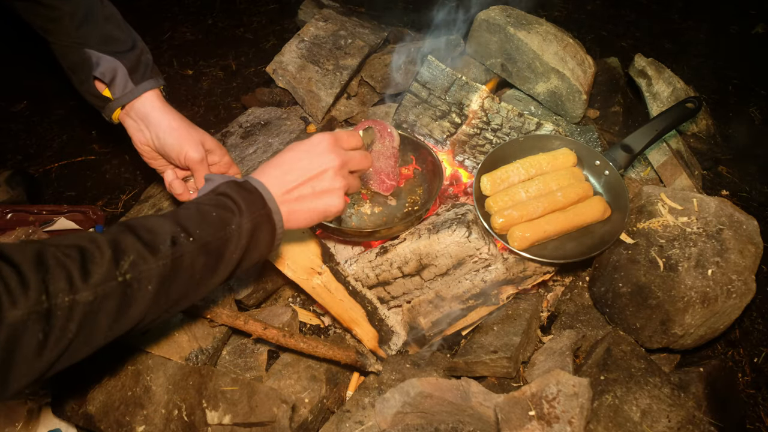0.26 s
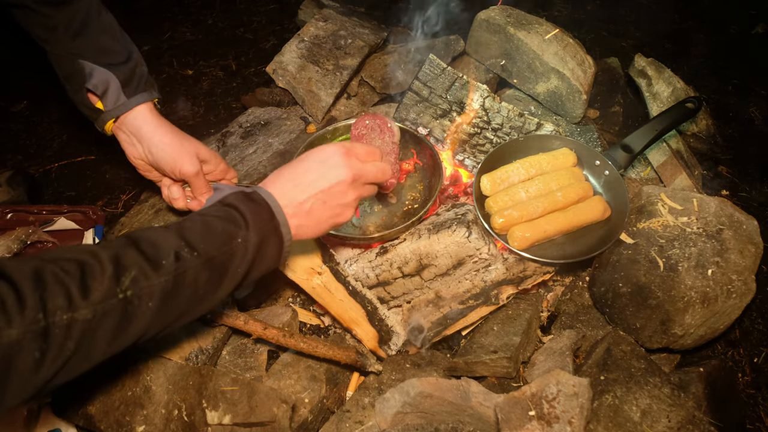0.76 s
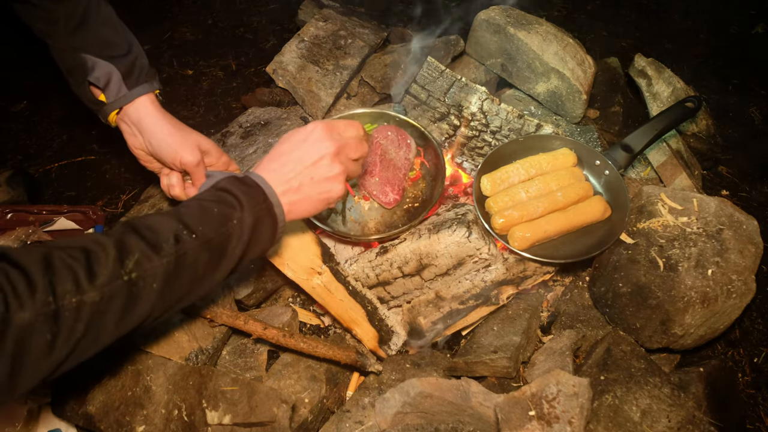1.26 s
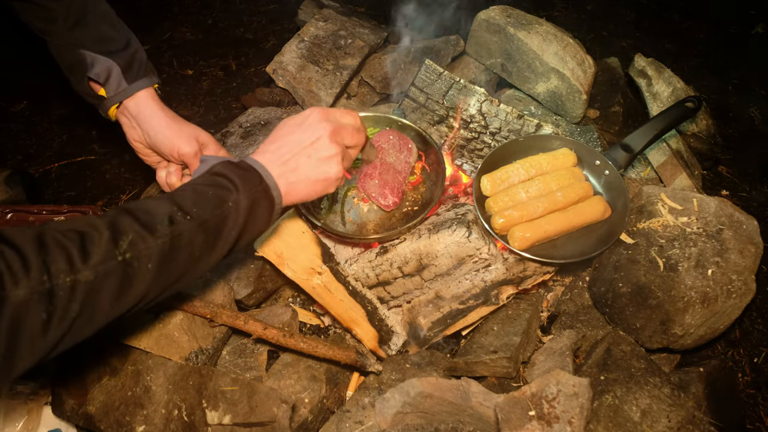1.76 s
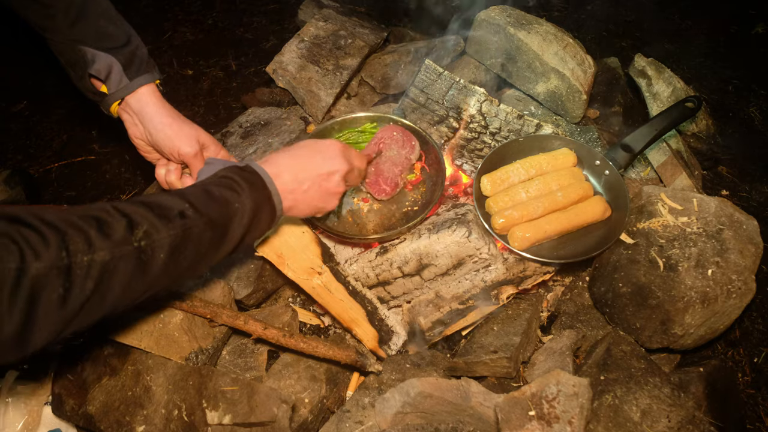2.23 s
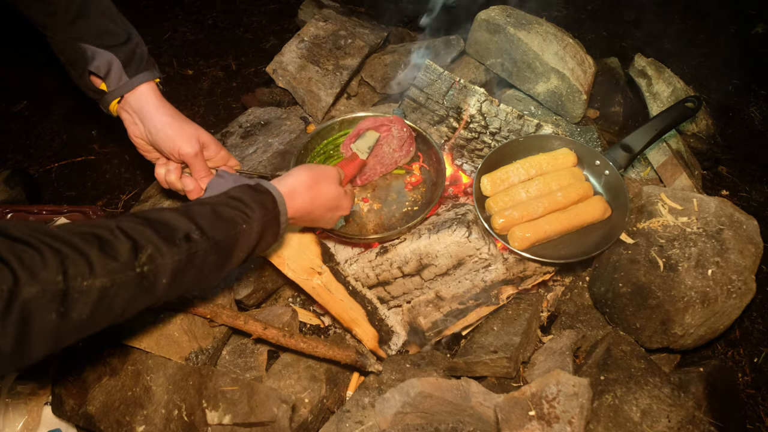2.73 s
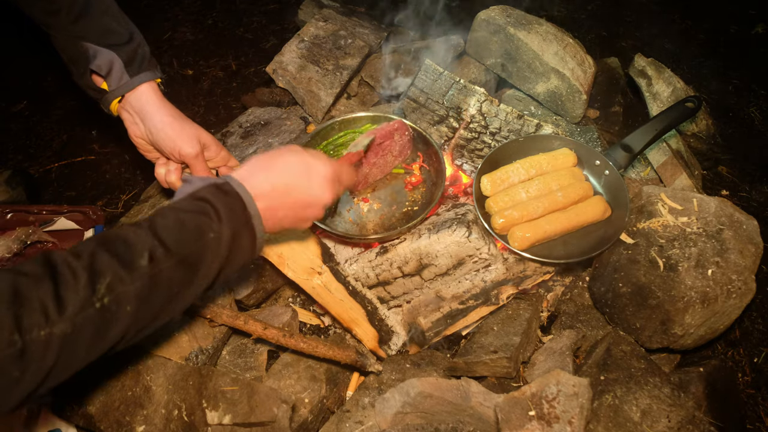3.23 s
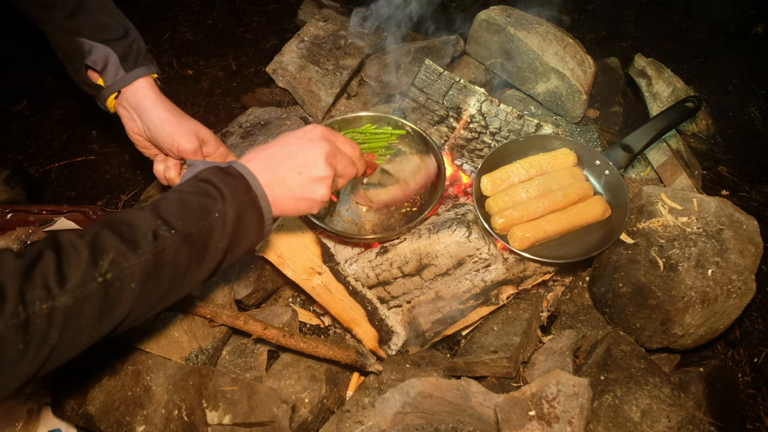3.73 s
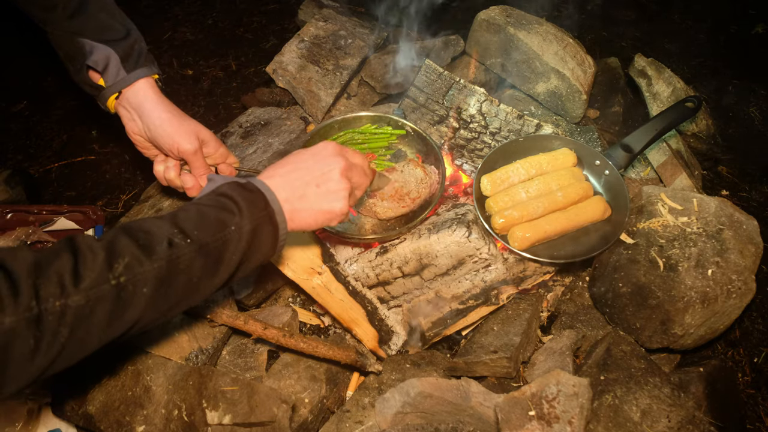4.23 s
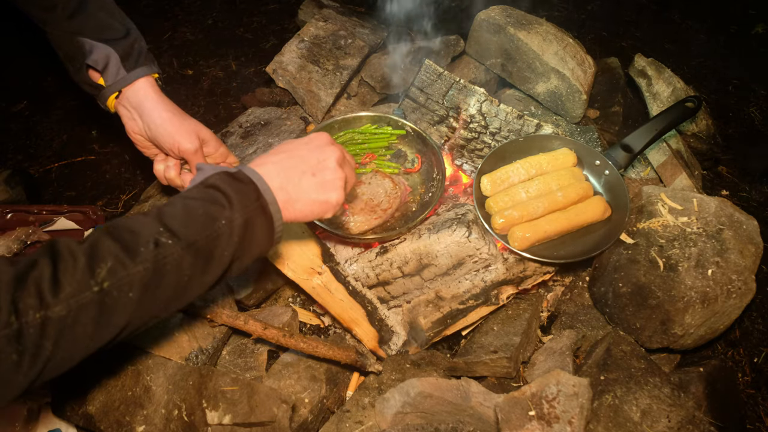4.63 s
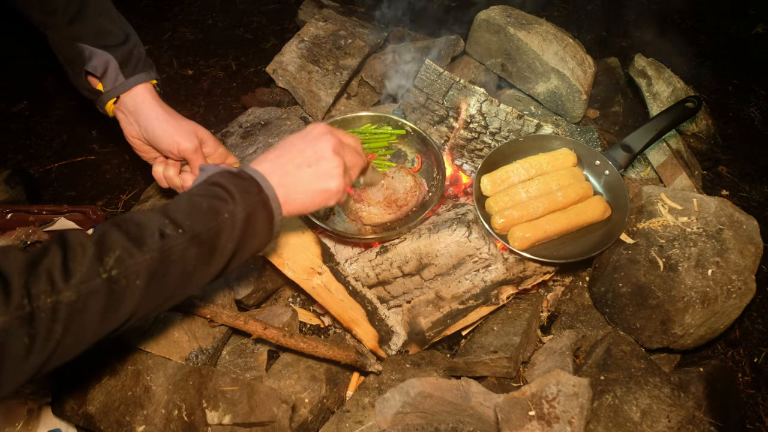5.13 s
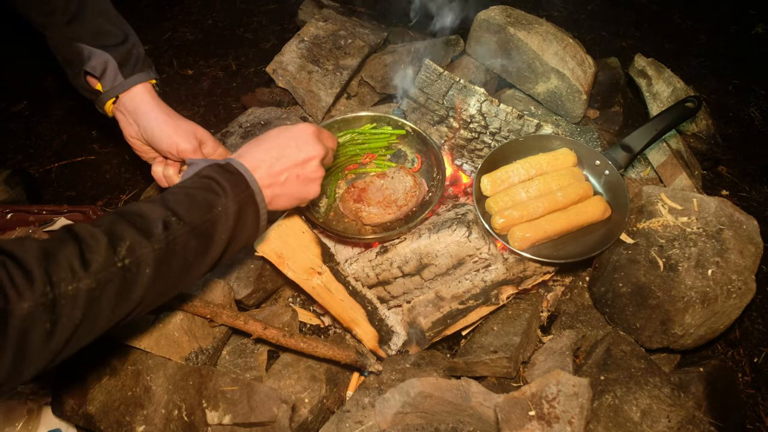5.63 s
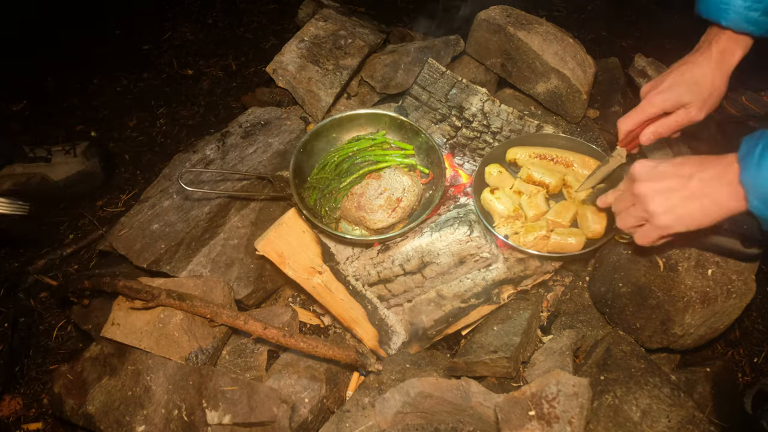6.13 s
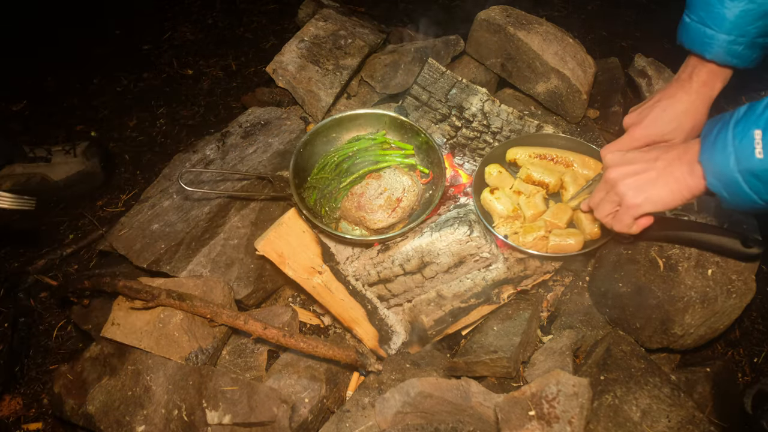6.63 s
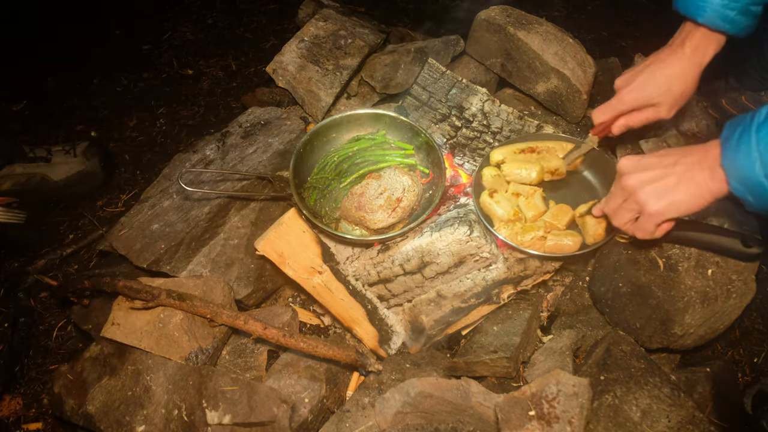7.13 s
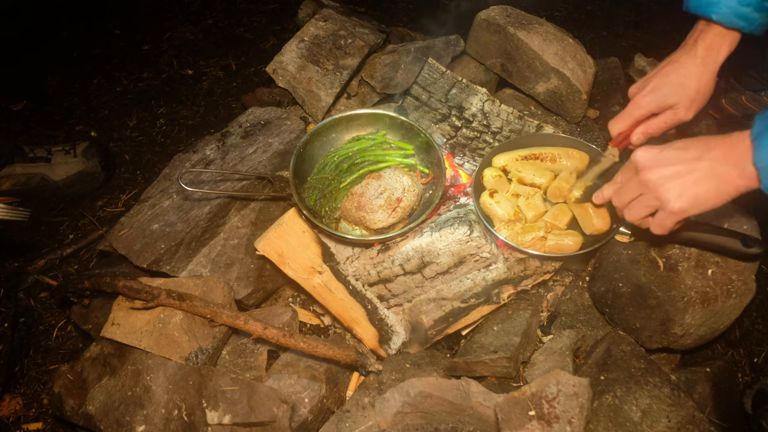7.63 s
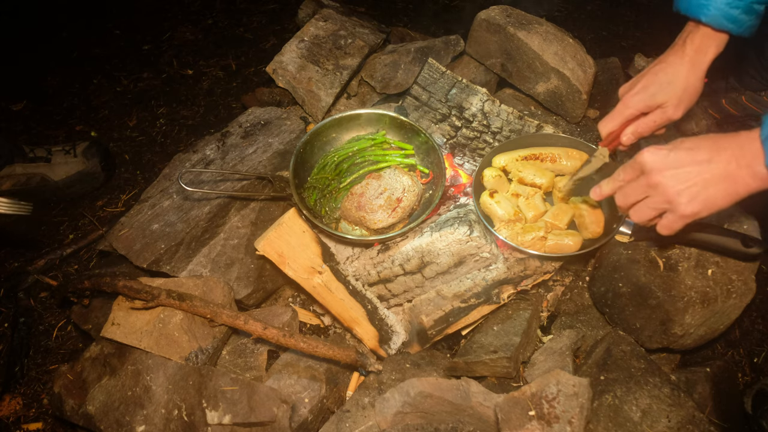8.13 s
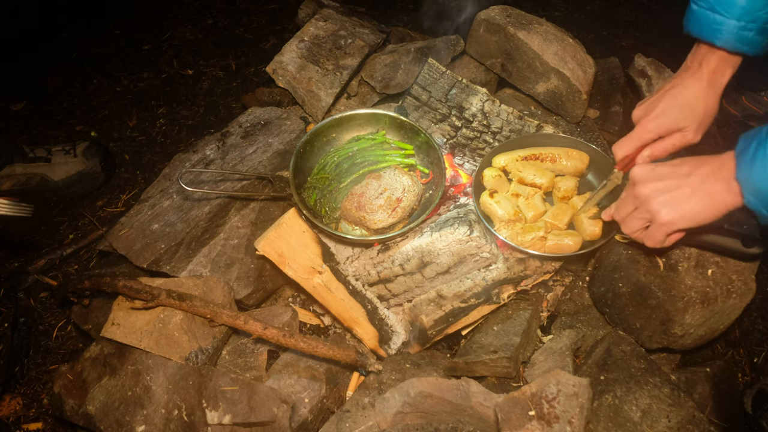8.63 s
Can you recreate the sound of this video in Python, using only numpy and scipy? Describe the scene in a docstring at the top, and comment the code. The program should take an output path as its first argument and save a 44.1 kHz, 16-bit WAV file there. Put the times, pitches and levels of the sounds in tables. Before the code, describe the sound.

Close, dry and centred, with no audible echo beyond a brief scatter off pan and stones. From 0 to 6.1 s meat sears loudly in hot fat: dense crackling and hiss, sharp irregular spits, a faint low flutter of fire beneath. Soft knocks at 0.7-0.95 s precede the meat being laid flat at about 1 s, when the sizzle turns brighter. Pressing near 2-2.5 s makes it fuller; after turning at 3.6-3.9 s it loses some high hiss. Three quick dull knocks fall at 5.4 s, another at 5.96. At 6.1 s a sharp knife crack marks a sudden drop to much quieter, gentle frying with small pops. Hollow taps and knocks cluster at 6.55-6.95, with a hard metallic clack at 6.82, a short grating and a thin falling squeak at 6.9. A lighter knife tick follows at 7.1; frying swells slightly around 7.2, then simmers on, with one faint knock at 8.27.

```python
"""At a campfire, meat sizzles in a steel pan: streams of steam bubbles burst in the fat and single drops spit.
The meat is laid flat, pressed and turned, and a utensil knocks on the pan. At 6.1 s the scene changes to
gentler frying, where a knife cuts food in a second pan and strikes its metal. Close, dry, mono. Bubbles and
drops are short damped oscillations, blows are resonances and noise, flames are low noise."""
import sys
import numpy as np
from scipy import signal
from scipy.fft import rfft, irfft
from scipy.io import wavfile
from scipy.ndimage import uniform_filter1d

SR = 44100
rng = np.random.default_rng(int(sys.argv[2]) if len(sys.argv) > 2 else 0)


def wrap_up_sound(samples):
    """Save the sound to the file named by the first command line argument, as 16-bit audio."""
    columns = np.atleast_2d(samples).T
    # keep every value between -1 and 1, then stretch to whole-number steps
    tamed = np.clip(columns, -1, 1)
    steps = np.round(tamed * 32767).astype(np.int16)
    wavfile.write(sys.argv[1], SR, steps)


N = 391166
T = np.arange(N) / SR
HZ = np.fft.rfftfreq(N, 1 / SR) + 1e-3  # offset keeps log(HZ) finite
AGE = T[:8192]  # seconds since the onset of a short sound
CHANGE_S = 6.099  # searing before, gentle frying after
TOP_HZ = 15800


def undb(db):
    """Decibels to gain."""
    return 10 ** (np.asarray(db) / 20)


def unit(x):
    """Scale to rms 1."""
    return x / np.sqrt(np.mean(x ** 2))


def add(out, start_s, sound, peak_db):
    """Mix a sound in at a time, with a given peak level."""
    i = int(start_s * SR)
    scaled = sound * undb(peak_db) / np.abs(sound).max()
    out[i:i + len(sound)] += scaled[:N - i]


def shape(points):
    """A (Hz, dB) table as dB at every frequency, interpolated on a log axis."""
    hz, db = np.transpose(points)
    return np.interp(np.log(HZ), np.log(hz), db)


def colour(x, db):
    """Causal minimum-phase filter with the given dB at every frequency, so pops keep their sharp front."""
    size = 2048
    log_gain = np.interp(np.fft.rfftfreq(2 * size, 1 / SR), HZ, db) * np.log(10) / 20
    cepstrum = irfft(log_gain)
    cepstrum[1:size] *= 2
    cepstrum[size + 1:] = 0
    impulse = irfft(np.exp(rfft(cepstrum)))[:size]
    return signal.oaconvolve(x, impulse)[:len(x)]


def band(x, lo_hz, hi_hz, order=2):
    """Butterworth band-pass."""
    edges_hz = [lo_hz, min(hi_hz, SR / 2 - 1)]
    return signal.sosfilt(signal.butter(order, edges_hz, "band", fs=SR, output="sos"), x)


def walk(points_per_s):
    """Random piecewise-linear curve of rms 1; holds its last value once 4096 points are used."""
    return unit(np.interp(T * points_per_s, np.arange(4096), rng.standard_normal(4096)))


def fade(t60_s):
    """Exponential decay by 60 dB in t60_s."""
    return np.exp(-np.log(1000) * AGE / t60_s)


def ping(hz, cycles):
    """A damped oscillation that falls to 1 / e in so many cycles; a small source radiates no bass."""
    wave = -np.sin(2 * np.pi * hz * AGE) * np.exp(-AGE * hz / cycles)
    return band(wave, hz / 2, SR / 2, order=1)


def stones(x, scatter_db, t60_s):
    """Direct sound plus a short noise-like scatter off the pan wall and the stones, new at every call."""
    tail = rng.standard_normal(len(AGE)) * fade(t60_s) * (AGE > .0005)
    scatter = signal.fftconvolve(x, tail / np.linalg.norm(tail))[:len(x)]
    return x + undb(scatter_db) * scatter


# Colour of the flames' low burr. Each row: frequency in Hz, relative density in dB per Hz.
FLAME_COLOUR = [(12, -47), (20, -5), (134, -2), (184, 2.5), (348, -6), (400, -36), (520, -38), (880, -120)]
FLAME_DB, FLAME_LATE_DB = -61.5, -68.5  # under the searing and under the gentle frying


def flames(searing_now):
    """The fire under the pans: low noise whose level flutters softly."""
    flutter_db = 1.7 * walk(9)
    level_db = np.where(searing_now, FLAME_DB, FLAME_LATE_DB) + flutter_db
    return unit(colour(rng.standard_normal(N), shape(FLAME_COLOUR))) * undb(level_db)


# Food squeaks on the hot metal. Each row: time in seconds, pitch in Hz before detuning, level in dB.
SQUEAK_GLIDE = [(6.905, 4150, -58), (6.925, 3750, -33), (6.94, 3400, -38), (6.953, 3080, -35),
                (6.975, 2800, -56)]


def squeak():
    """Food rubbing on hot metal: a thin sine whistle that falls in pitch, detuned at random."""
    s, hz, db = np.transpose(SQUEAK_GLIDE)
    detune = 1 + 0.033 * walk(680)  # the walk has run out by now: a fixed offset
    phase = np.cumsum(np.interp(T, s, hz) * detune) / SR
    whistle = np.sin(2 * np.pi * phase) * undb(np.interp(T, s, db))
    return whistle * (T > s[0]) * (T < s[-1])


# Taps on the food and the pan floor. Each row: start in seconds, peak in dB, pitch in Hz.
FLOOR_TAPS = [(6.553, -35, 1750), (6.567, -35, 1600), (6.658, -20, 1110), (6.771, -34, 1140),
              (6.866, -26, 1340), (6.934, -30, 1120)]


def taps():
    """Hollow taps: one damped note each, with a softened onset."""
    out = np.zeros(N)
    for s, db, hz in FLOOR_TAPS:
        hollow = band(ping(hz, cycles=3) * (1 - fade(0.012)), 300, 4000)
        add(out, s, stones(hollow, -19, t60_s=.03), db)
    return out


# Utensil and pan on the logs. Each row: start in seconds, peak in dB, pitch in Hz,
# gain of the tick in dB, thud peak in dB relative to the knock.
DULL_KNOCKS = [(.712, -32, 480, -8, -20), (.783, -24.5, 524, -8, -23), (.947, -30, 400, -3, -12),
               (5.3715, -15.5, 560, 2, -25), (5.423, -13, 500, 3, -28), (5.4805, -11.5, 540, 7, -30),
               (5.961, -24.5, 440, -6, -20), (6.582, -32, 660, -5, -29), (6.659, -27, 510, -8, -30),
               (6.8238, -25, 470, -2, -23), (6.8675, -25.5, 470, -8, -22), (6.925, -25, 540, -5, -30),
               (6.933, -32, 580, -7, -30), (8.266, -32.5, 382, 8, -14)]
# Resonances of a knock. Each row: ratio to its pitch, cycles of ring to 1 / e, signed gain.
KNOCK_RESONANCES = [(.69, 1.1, .8), (1.4, 1.8, -1)]
LOG_HZ = 153


def knocks():
    """Soft blows: two damped resonances of the pan, a noise tick, one short echo and a thud of the logs."""
    out = np.zeros(N)
    for s, db, hz, tick_db, thud_db in DULL_KNOCKS:
        resonances = sum(gain * ping(hz * ratio, cycles) for ratio, cycles, gain in KNOCK_RESONANCES)
        body = band(resonances, 240, 2800)
        tick = band(rng.standard_normal(len(AGE)), 800, 3000) * fade(0.029)
        add(out, s, stones(body + undb(tick_db) * tick, -5.5, t60_s=0.067), db)
        add(out, s + 0.01045, body, db - 19)  # a faint echo
        add(out, s, ping(LOG_HZ, cycles=0.76), db + thud_db)
    return out


GRATE_S, GRATE_DB, GRATE_T60_S = 6.826, -28, .22
SETTLE_S, PAN_FOOT_HZ, PAN_FOOT_T60_S, PAN_FOOT_DB = 6.866, 176, 0.1, -40


def grating():
    """After a blow the pan grates on the logs as decaying noise, then settles with a low hum."""
    out = np.zeros(N)
    grate = band(rng.standard_normal(len(AGE)), 140, 1100) * fade(GRATE_T60_S)
    add(out, GRATE_S, grate, GRATE_DB)
    hum = np.sin(2 * np.pi * PAN_FOOT_HZ * AGE) * fade(PAN_FOOT_T60_S) * (1 - fade(0.018))
    add(out, SETTLE_S, hum, PAN_FOOT_DB)
    return out


# Knife on the pan. Each row: start in seconds, crack peak in dB, pitch of the crack's noise band in Hz,
# ring peak in dB relative to the crack, before RING_LIFT_DB.
KNIFE_STRIKES = [(6.119, -4.5, 5030, -31.5), (6.1202, -17, 4600, -32), (6.8235, -4.5, 6300, -32),
                 (6.8257, -8, 2900, -5.5), (6.8695, -15.5, 3100, -11), (7.113, -15, 5000, -20)]
# Modes of the pan. Each row: frequency in Hz, relative level in dB, t60 in seconds.
PAN_MODES = [(745, -11, .07), (1045, -12, .04), (1335, -9, .07), (1700, -5, .04), (2470, -4, .035),
             (2935, 0, .045), (3140, -5, .03), (3435, -2, .05), (3860, -6, .045), (4275, -3, .03),
             (4500, -9, .035), (4910, -8, .045), (5645, -10, .03), (6095, -11, .03)]
RING_LIFT_DB = 10.5


def knife():
    """The blade cracks on the metal as a noise burst, and the pan's modes ring briefly."""
    out = np.zeros(N)
    modes = sum(undb(db) * np.sin(2 * np.pi * hz * AGE) * fade(t60_s) for hz, db, t60_s in PAN_MODES)
    ring = band(modes, 530, 12000)
    for s, db, hz, ring_db in KNIFE_STRIKES:
        crack = band(rng.standard_normal(len(AGE)), hz * 0.85, hz * 1.07, order=1) * fade(0.0095)
        add(out, s, stones(crack, -12.5, t60_s=.045), db)
        add(out, s, stones(ring, -13, t60_s=0.047), db + ring_db + RING_LIFT_DB)
    return out


def drops(start_s, end_s, per_s, db, spread_db, hz, spray_db):
    """Lesser spits at random moments, each with its own strength, pitch and spray."""
    times = start_s + np.cumsum(rng.exponential(size=80)) / per_s
    chance = rng.standard_normal((len(times), 3))
    return [(s, db + spread_db * a, hz * 2 ** (0.34 * b), spray_db + 3 * c)
            for s, (a, b, c) in zip(times, chance) if s < end_s]


# Single drops of fat that spit. Each row: start in seconds, peak in dB, pitch in Hz,
# spray in dB relative to the snap.
FAT_SPITS = [(.5693, -3, 3860, -10), (.6911, -3.5, 4130, -14), (1.3397, -2, 3800, -14),
             (1.4067, -2, 4200, -14), (1.6745, -3, 3890, -9), (1.8984, -2.5, 2700, -3),
             (2.1414, -4, 2960, -7), (2.7315, -6, 3300, -3), (2.9115, -2, 3900, 1), (3.1124, -1, 5510, -14),
             (3.7927, -3.5, 2840, -4), (4.1132, -4, 2850, -5), (4.2443, -6.5, 5110, -4),
             (4.4362, -8, 2650, -6), (4.5532, -8, 2810, -7), (5.0699, -1, 3130, -7), (5.6072, -5, 4680, -4),
             (6.2329, -12, 5550, -3), (6.335, -15, 6340, -3), (7.0961, -9.5, 5560, -5),
             (7.1081, -14, 4680, -5), (7.2986, -10, 5510, -3), (7.5506, -15, 3670, -4),
             (7.6304, -11, 5680, -9), (7.8275, -14.5, 5480, -4), (8.3583, -13, 7000, -2)]
SPRAY_T60_S = .008


def spits():
    """A drop of water explodes in the fat: a heavily damped snap, then its spray rattles on the pan."""
    out = np.zeros(N)
    sear_drops = drops(0, CHANGE_S, per_s=5, db=-8.3, spread_db=1.2, hz=3300, spray_db=-10)
    simmer_drops = drops(CHANGE_S, T[-1], per_s=7, db=-18.5, spread_db=1.2, hz=4600, spray_db=-8)
    for s, db, hz, spray_db in [*FAT_SPITS, *sear_drops, *simmer_drops]:
        snap = ping(hz, cycles=.8)
        scatter = stones(snap, 0, t60_s=SPRAY_T60_S) - snap
        spray = band(scatter, hz / 3, hz * 3, order=1)
        spray = spray * np.linalg.norm(snap) / np.linalg.norm(spray)
        add(out, s, band(snap + undb(spray_db) * spray, 1300, 12000), db)
    return out


def bubbles(spread_db, range_db, cycles, flurry_db):
    """Dense bursting bubbles in nine pitches, evened in colour: most tiny, a few loud, swelling in flurries."""
    out, power, together = 0, 0, walk(22)
    for hz in np.geomspace(900, 13000, num=9):
        # so dense that every sample holds a burst of random size
        bursts = undb(np.minimum(spread_db * rng.exponential(size=N), range_db))
        bursts = unit(bursts - bursts.mean()) * undb(flurry_db * (together + walk(30)))
        pop = ping(hz, cycles)[:512]
        pop = pop * np.sqrt(hz) / np.linalg.norm(pop)
        out = out + signal.oaconvolve(bursts, pop)[:N]
        power = power + np.abs(rfft(pop)) ** 2
    pop_hz = np.linspace(0, SR / 2, len(power))
    even_db = -10 * np.log10(np.interp(np.maximum(HZ, 200), pop_hz, power))
    return unit(colour(out, even_db))


SCATTER_T60_S = 0.025


def crackle(pops_per_s, spread_db, range_db, scatter_db):
    """Sparse, sharp pops of all pitches at once, each with a few milliseconds of scatter behind it."""
    sizes = undb(np.minimum(spread_db * rng.exponential(size=N), range_db))
    pops = (rng.random(N) < pops_per_s / SR) * sizes
    decay = fade(SCATTER_T60_S) ** 2  # of power
    scatter = np.sqrt(np.abs(signal.oaconvolve(pops ** 2, decay / decay.sum())[:N]))
    return unit(undb(scatter_db) * scatter * rng.standard_normal(N) - pops)


# Colour of the gentle frying. Each row: frequency in Hz, relative density in dB per Hz.
GENTLE_COLOUR = [(59, -55), (100, -19), (181, -28), (300, -23), (457, -24), (497, -19), (668, -14),
                 (825, -17), (1040, -15), (2750, -3.5), (4660, -3.5), (5510, -3), (7250, -5.5),
                 (8230, -5.5), (15500, -16)]
SIMMER_DB, STIR_DB, STIR_PEAK_S, STIR_WIDTH_S = -35, 2.5, 7.23, 1


def gentle_frying():
    """Cooler fat: softer, with fewer sharp pops; it swells while the food is cut and stirred."""
    fizz = bubbles(spread_db=4.5, range_db=19.5, cycles=1.44, flurry_db=0.25)
    fizz = fizz + undb(-4.0) * crackle(pops_per_s=190, spread_db=4.5, range_db=9.5, scatter_db=-3.5)
    stir = np.exp(-((T - STIR_PEAK_S) / STIR_WIDTH_S) ** 2)
    level_db = SIMMER_DB + STIR_DB * stir + 0.3 * walk(13)
    return unit(colour(fizz, shape(GENTLE_COLOUR))) * undb(level_db)


# Meat pushed onto the hot metal or eased off it. Each row: start in seconds, hold in seconds,
# full change of level in dB, tilt in dB per octave.
MEAT_PUSHES = [(1.012, 0.045, -2, 1), (1.04, 0.14, 2, -0.8), (1.14, 0.45, 1.54, 1), (1.6, 0.2, 0, 1.5),
               (1.877, 0.065, -0.5, -1), (1.957, 0.45, 3, -0.4), (2.5, .29, -2.1, -0.7),
               (2.954, .23, 2, 0.8), (3.25, .36, 1.3, 1.5), (3.913, 0.058, -3.5, 1.3),
               (4.027, 0.11, 0.5, -0.5), (4.265, 0.17, 0, 0.2), (4.515, 0.044, -3, 1),
               (4.625, 0.39, 2, 0.1), (5.717, 0.32, 2.5, -0.6)]
TILT_PIVOT_HZ = 3560
FLUTTER_DB, FLUTTER_PER_S = .5, 11


def activity(hz, db, drift_db_per_s, rise_s, release_s):
    """Level in dB of one bubble size: drifts as the water cooks off, flutters, follows and relaxes from pushes."""
    db = db + drift_db_per_s * T + FLUTTER_DB * walk(FLUTTER_PER_S)
    for s, hold_s, change_db, tilt_db in MEAT_PUSHES:
        onset = 1 - np.exp(-np.clip(T - s, 0, hold_s) / rise_s)
        release = np.exp(-np.maximum(T - s - hold_s, 0) / release_s)
        db = db + onset * release * (change_db + tilt_db * np.log2(hz / TILT_PIVOT_HZ))
    return db


# Sizzle colour with the meat lifted, lying flat, pressed and turned over.
# Each row: frequency in Hz, relative density in dB per Hz.
LIFTED_COLOUR = [(59, -54), (100, -23), (447, -21), (519, -16), (1760, -1.5), (2370, -4.5), (3250, 1),
                 (3850, -3), (4750, 1), (6530, -7), (7250, -6), (12300, -11.5), (15500, -19)]
FLAT_COLOUR = [(59, -56), (100, -33), (233, -25.5), (429, -25), (825, -13), (1040, -13), (1840, -5.5),
               (3250, -1.5), (3770, -2.5), (4860, 2), (6390, 0), (8060, 1), (13100, -5), (15500, -11)]
PRESSED_COLOUR = [(59, -60), (100, -34), (238, -27), (287, -30), (429, -28.5), (808, -15.5), (1490, -10.5),
                  (1880, 1.5), (2810, 3.5), (3770, -2.5), (4370, 0.5), (7250, -2), (13100, -9),
                  (15500, -14)]
TURNED_COLOUR = [(59, -60), (100, -31), (333, -30.5), (411, -29.5), (791, -18), (1430, -14.5), (2350, -0.5),
                 (2870, 2), (3770, -3), (4960, 1), (6390, -6), (7100, -7.5), (9340, -12), (12000, -14.5),
                 (15500, -20.5)]
# Peaks and hollows from the pan's bowl. Each row: centre in Hz, width in Hz, gain in dB.
BOWL_PEAKS = [(1500, 85, -1.5), (2140, 360, 0), (2500, 270, -2), (2810, 79, 1.5), (3320, 150, 1),
              (3770, 190, -3), (5080, 110, 1), (6480, 170, -2), (7080, 320, 2), (8300, 250, 1.5)]
# Bubble sizes, large crackle to fine spray. Each row: pitch in Hz, level in dB, drift in dB per second,
# rise in seconds, release in seconds.
BUBBLE_SIZES = [(1220, -35.5, -0.59, 0.11, 0.27), (2530, -24, -1.18, 0.037, 0.016),
                (4850, -28, -0.09, 0.07, 0.032), (9050, -28, 0.39, 0.028, 0.17)]


def searing():
    """Meat in hot fat: large bubbles crackle low, small ones hiss; contact with the metal sets colour and level."""
    fizz = bubbles(spread_db=4.0, range_db=20.0, cycles=1.3, flurry_db=0.28)
    fizz = fizz + undb(-6.0) * crackle(pops_per_s=260, spread_db=4.5, range_db=10.5, scatter_db=0.0)
    bowl_db = sum(db * np.exp(-((HZ - hz) / width_hz) ** 2) for hz, width_hz, db in BOWL_PEAKS)
    laid = np.interp(T, [1.0, 1.1], [0, 1])
    pressed = np.interp(T, [1.9, 2.1, 2.42, 2.6], [0, 1, 1, 0])
    turned = np.interp(T, [3.6, 3.9], [0, 1])
    stages = [(1 - laid, LIFTED_COLOUR), (laid - pressed - turned, FLAT_COLOUR),
              (pressed, PRESSED_COLOUR), (turned, TURNED_COLOUR)]
    fizz = sum(share * unit(colour(fizz, shape(points) + bowl_db)) for share, points in stages)
    # one band per bubble size, levelled over 1/8 s, then given its own activity
    below = [signal.sosfiltfilt(signal.butter(4, hz, fs=SR, output="sos"), fizz) for hz in (1700, 3700, 6400)]
    bands = np.diff([np.zeros(N), *below, fizz], axis=0)
    out = np.zeros(N)
    for x, row in zip(bands, BUBBLE_SIZES):
        level = x / np.sqrt(uniform_filter1d(x ** 2, size=SR // 8))
        out += level * undb(activity(*row))
    return out


def scene():
    """All sources, the same in both channels."""
    searing_now = T < CHANGE_S
    sizzle = np.where(searing_now, searing(), gentle_frying())
    blows = taps() + knocks() + grating() + knife()
    mono = flames(searing_now) + squeak() + blows + spits() + sizzle
    return np.array([mono, mono])


def record(dry):
    """Clip peaks at 0.9 of full scale, then cut the top above TOP_HZ."""
    low_pass = signal.ellip(10, .05, 60, TOP_HZ, fs=SR, output="sos")
    return signal.sosfiltfilt(low_pass, np.clip(dry, -.9, .9))


dry = scene()
out = record(dry)
wrap_up_sound(out)
```